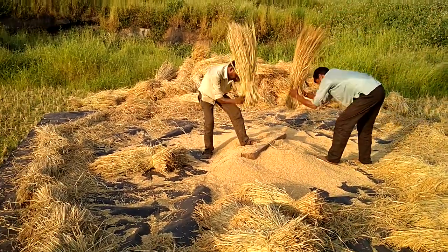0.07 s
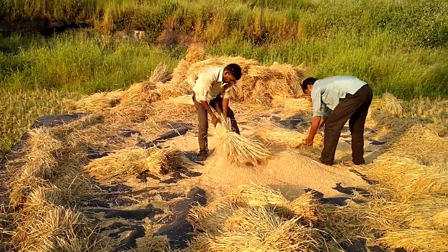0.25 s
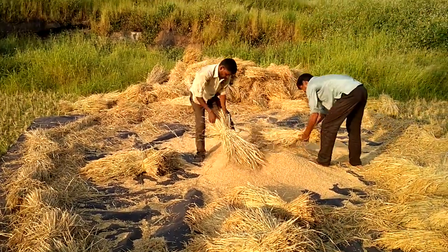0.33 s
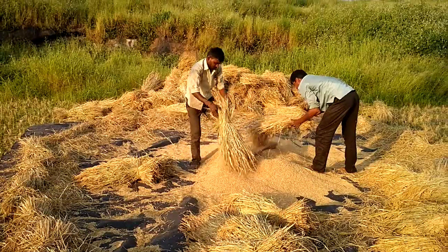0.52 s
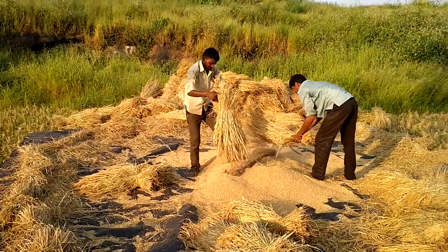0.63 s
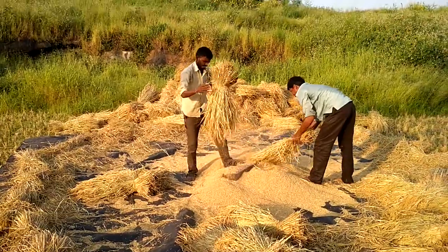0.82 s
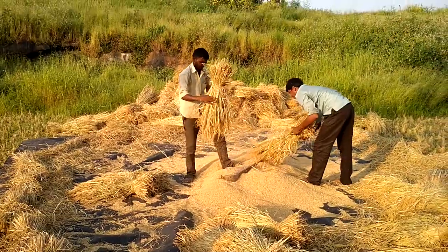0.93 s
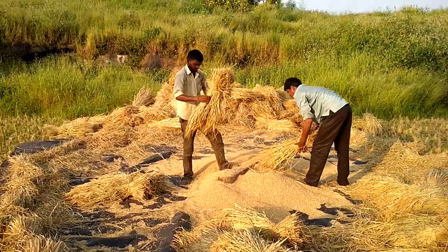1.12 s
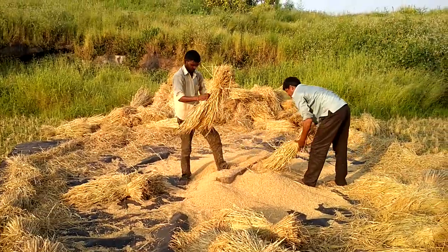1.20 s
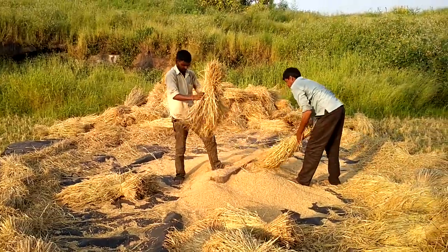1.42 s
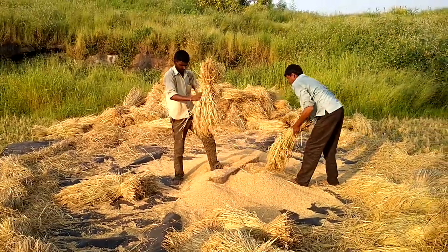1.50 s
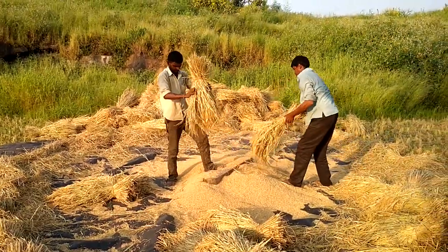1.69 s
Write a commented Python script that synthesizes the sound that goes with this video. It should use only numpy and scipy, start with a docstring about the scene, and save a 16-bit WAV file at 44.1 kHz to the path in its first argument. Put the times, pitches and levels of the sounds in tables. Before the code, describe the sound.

Bundles of dry straw hit heaped grain once, then crackle and hiss while being shaken.

```python
"""An open field, where two workers thresh rice. Their sheaves swish down and slap the grain pile
together, then are dragged up and shaken while loose grain patters down. Rubbing husks hiss, dry
stalks crackle and snap, and feet and sheaves knock softly on the ground. Under it all lie a faint
field hiss and a breath of wind. Each microphone port colours the treble in its own way."""
import sys
import numpy as np
from scipy import signal
from scipy.fft import rfft, irfft, next_fast_len
from scipy.io import wavfile
from scipy.ndimage import map_coordinates

SR = 44100
rng = np.random.default_rng(int(sys.argv[2]) if len(sys.argv) > 2 else 0)


def inscribe(sig):
    """Save sig as 16-bit PCM at rate SR to the path in sys.argv[1].

    A 1-D sig is mono; a 2-D sig holds one channel per row.
    Samples are clipped to [-1, 1] before scaling.
    """
    pcm = np.round(np.clip(np.atleast_2d(sig).T, -1, 1) * 32767)
    wavfile.write(sys.argv[1], SR, pcm.astype(np.int16))


N = 77175

# Sheaf moves. Each row: peak time, rise, hold and t60 in seconds, then hiss level, crackle level,
# hiss left over right, left top-end trim and right top-end trim, all in dB.
SHEAF_STROKES = [(0.25, 0.18, 0.053, 0.081, -25.5, -35, 3.5, -2.5, -1),
                 (0.328, 0.23, 0.088, 0.29, -30.5, -77, 7, -2.5, -3),
                 (0.725, 0.055, 0.03, 0.25, -58, -50, -5, 2, 0),
                 (0.847, 0.076, 0.029, 0.29, -26, -40.5, -2, 1, -11),
                 (0.91, 0.023, 0.0065, 0.12, -37, -42, 14, 3, -10),
                 (1.076, 0.047, 0.067, 0.19, -26.5, -35, 4.5, -4, 3.5),
                 (1.158, 0.18, .11, 0.31, -28.5, -40.5, 4, -2, 1),
                 (1.324, 0.24, .03, 0.9, -55.5, -41.5, 24, 3, -1),
                 (1.452, 0.13, 0.027, 0.26, -32.5, -38.5, 9.5, -0.5, -8),
                 (1.553, 0.35, 0.014, 0.38, -34.5, -41.5, 22, -8.5, 7.5)]
# Modes of the grain pile. Each row: pitch in Hz, level in dB, t60 in seconds.
PILE_MODES = [(66, -28, 0.038), (108, -29, .06), (216, -31.5, 0.11), (327, -47, .06), (497, -33.5, 0.066)]
# Fader ride on the falling grain. Each row: time in seconds, level in dB.
PATTER_FADER = [(.1, -73.5), (.3, -43.5), (.47, -40), (.56, -43), (0.659, -43.5), (0.801, -38.5),
                (.92, -41), (.97, -47.5), (1.04, -44.5), (1.12, -46.5), (1.4, -42), (1.58, -55),
                (1.66, -48.5), (1.75, -56.5)]
# Single stalks breaking. Each row: time in seconds, centre in Hz, level in dB.
STALK_SNAPS = [(0.354, 1920, -59), (0.376, 1970, -43.5), (0.455, 1710, -36), (0.463, 1530, -42.5),
               (0.584, 1840, -43), (0.629, 2240, -39.5), (0.655, 1860, -39), (.73, 2200, -37.5),
               (0.74, 1980, -37), (0.786, 2390, -46), (.913, 1450, -38.5), (.987, 1570, -38),
               (1.073, 4770, -33.5), (1.088, 4350, -28), (1.114, 1320, -40), (1.298, 2240, -38),
               (1.355, 2230, -36.5), (1.372, 1840, -41), (1.407, 2480, -42), (1.433, 2860, -33),
               (1.499, 2100, -39), (1.568, 2840, -41)]
# Bumps of feet and sheaves. Each row: start in seconds, pitch in Hz, level in dB, t60 in seconds.
GROUND_KNOCKS = [(0.397, 99, -43, 0.056), (.545, 380, -60.5, 0.035), (.584, 466, -51.5, 0.021),
                 (.738, 488, -51, 0.057), (0.825, 323, -50.5, 0.03), (0.908, 276, -56, 0.11),
                 (1.0, 55, -66, 0.075), (1.022, 302, -49, 0.026), (1.114, 520, -43.5, 0.028),
                 (1.367, 427, -58, 0.057), (1.7, 377, -54, 0.038)]

# EQ curves of the noise layers and the two ports. Each row: frequency in Hz, relative gain in dB.
HUSK_EQ = [(600, -48), (2000, -28), (4000, -27.5), (7000, -13), (9000, -6), (11500, 0), (13000, -0.5),
           (14500, 1), (16000, -5.5)]
CRACKLE_EQ = [(100, -38), (400, -25), (720, -19), (950, -4.5), (1600, -5.5), (2300, 4), (3400, 2.5),
              (4500, 0), (6000, -2), (9000, 5.5), (11000, -37), (16000, -11)]
SLAP_EQ = [(60, -16), (250, -3), (470, -2.5), (700, -6), (1300, -6.5), (2200, 3), (4000, -5), (6000, -5.5),
           (8500, 5.5), (11000, -26), (16000, -20)]
PUFF_EQ = [(20, 1.5), (60, -0.5), (130, -3.5), (220, -7), (340, -3), (500, -17), (800, -18), (2000, -54)]
GRAIN_EQ = [(100, -27), (400, -12.5), (720, -18.5), (950, 1.5), (1600, -6), (2300, 2.5), (3200, -1),
            (4400, -6), (5600, -1.5), (7500, 2.5), (9200, 2), (9800, -12), (10600, -6), (11700, -3.5),
            (14000, -6), (16000, 0.5)]
FIELD_EQ = [(20, 15), (60, 13), (130, 1.5), (220, 2.5), (500, -2.5), (1000, -6), (3000, -8.5), (6000, -5.5),
            (9000, 9), (12000, 6.5), (16000, 9.5)]
WIND_EQ = [(20, 1), (40, -2.5), (70, -22), (120, -13.5), (200, -30), (600, -39.5)]
LEFT_PORT_EQ = [(1000, -1), (2200, -1.5), (3700, 0.5), (5600, 5.5), (8000, -4), (9300, 1.5), (10300, -61),
                (11000, -12), (12000, -8), (13200, -4), (14500, 0.5), (15600, 1.5)]
RIGHT_PORT_EQ = [(1000, -0.5), (2200, 1.5), (3700, 6), (5600, 2), (8000, -1), (9300, -1), (10300, 3),
                 (11000, 9.5), (12000, 11), (13200, 6.5), (14500, -0.5), (15600, 4)]

# Stereo images of the scene and the slap. Each row: frequency in Hz, left-right likeness from -1 to 1.
SCENE_IMAGE = [(100, 0.41), (1000, 0.89), (2200, 0.64), (3200, -0.02), (4500, -0.02), (6000, -0.25),
               (7500, 0.13), (9000, 0.33), (11500, -0.21), (13500, 0.24), (16000, 0.084)]
SLAP_IMAGE = [(60, 0.5), (200, .5), (400, 0.03), (1000, 0.17), (2500, 0.11), (5000, 0), (14000, 0.2)]


def sheaf_strokes():
    """Swinging sheaves: husks rub into a fine hiss, stalks bend and crackle."""
    husks = ticks(per_second=7000, spread_db=3)
    stalks = ticks(per_second=2000, spread_db=4)
    hiss = sliding_stalks(texture(HUSK_EQ, grit=husks, smooth=0.74), depth_db=1.0)
    top = filtered(hiss, lambda hz: np.clip((hz - 11500) / 1200, 0, 1))
    crackle = sliding_stalks(texture(CRACKLE_EQ, grit=stalks, smooth=0.8), depth_db=2.5)
    envelopes = np.array([swell(*row[:4]) for row in SHEAF_STROKES])
    hiss_db, crackle_db, pan_db, *trim_db = np.transpose(SHEAF_STROKES)[4:]
    fader = lambda db: np.sqrt(amp(db) ** 2 @ envelopes ** 2)  # overlapping strokes add in power
    sides_db = hiss_db + np.array([pan_db, -pan_db]) / 2
    top_db = sides_db + np.array(trim_db)
    return (hiss - top) * fader(sides_db) + top * fader(top_db) + crackle * fader(crackle_db)


def slap():
    """The big hit: hundreds of stalks land at once, grain sprays, the pile thuds and air puffs out."""
    contacts = ticks(per_second=6000, spread_db=3)
    stalks = hollow(texture(SLAP_EQ, SLAP_IMAGE))
    stalks *= amp(-21.5) * swell(0.302, rise=0.044, hold=0.0049, t60=0.082)
    spray = hollow(texture(HUSK_EQ, SLAP_IMAGE, grit=contacts, smooth=0.48))
    spray *= amp(-18.5) * swell(0.2975, rise=0.008, hold=0.021, t60=0.11)
    puff = amp(-49.5) * swell(0.2624, rise=0.087, hold=0.072, t60=0.39) * texture(PUFF_EQ)
    return stalks + spray + pile_thud() + puff


def pile_thud(start_s=0.3, attack_s=0.0028):
    """The weight under the slap: the pile gives way with a few heavily damped low modes."""
    t = np.maximum(clock() - start_s, 0)
    modes = sum(amp(db - 60 * t / t60) * np.sin(2 * np.pi * hz * t) for hz, db, t60 in PILE_MODES)
    return (1 - np.exp(-t / attack_s)) * modes


def falling_grain():
    """Freed grains patter on the pile and the straw."""
    grains = ticks(per_second=1500, spread_db=5)
    patter = sliding_stalks(texture(GRAIN_EQ, grit=grains, smooth=0.64), depth_db=2.5)
    level_db = np.interp(clock(), *np.transpose(PATTER_FADER))
    return amp(level_db) * patter


def stalk_snaps(rolloff_db_per_octave=7.5):
    """Now and then one stalk cracks through the rustle, in its own register and with no bass."""
    out = np.zeros((2, N))
    for at_s, hz, db in STALK_SNAPS:
        eq = [(hz / 4, -35), (hz / 2, -8), (hz, 0), (8 * hz, -3 * rolloff_db_per_octave)]
        out += amp(db) * swell(at_s, rise=0.0016, hold=0, t60=0.027) * texture(eq)
    return out


def ground_knocks(attack_s=0.0019):
    """Dull, quickly damped bumps on the covered ground, each half thump and half scuff."""
    out = np.zeros((2, N))
    for start_s, hz, db, t60 in GROUND_KNOCKS:
        t = np.maximum(clock() - start_s, 0)
        thump = np.sqrt(2) * np.sin(2 * np.pi * hz * t)
        scuff = texture([(hz / 4, -14), (hz, 0), (2 * hz, -7), (10 * hz, -28)])
        envelope = amp(db - 60 * t / t60) * (1 - np.exp(-t / attack_s))
        out += envelope * (thump + scuff)
    return out


def field_air():
    """The bed: faint open-field hiss and one low breath of wind on the ports."""
    bed = amp(-60.5) * texture(FIELD_EQ)
    breeze = amp(-56.5) * swell(0.13, rise=0.9, hold=0.24, t60=0.46) * texture(WIND_EQ)
    return bed + breeze


def sliding_stalks(x, depth_db, width_hz=262.7, life_s=0.0599):
    """Stalks slide past each other, so narrow resonances come and go."""
    size, hop = 1024, 512
    spectrum = signal.stft(x, nperseg=size)[2]
    band, frame = np.indices(spectrum.shape[1:])
    position = [band * SR / size / width_hz, frame * hop / SR / life_s]
    patches = map_coordinates(rng.standard_normal((256, 128)), position, mode="wrap")
    coloured = signal.istft(spectrum * amp(depth_db * patches), nperseg=size)[1]
    return unit(coloured[:, :N])


def hollow(pair, bleed=0.6, delay_s=0.0026):
    """Each side reaches the other a moment late, which sounds wide and hollow."""
    crossed = filtered(pair[::-1], lambda hz: np.exp(-2j * np.pi * hz * delay_s))
    return unit(pair + bleed * crossed)


def ticks(per_second, spread_db):
    """Envelope of tiny random contacts of uneven size, each about a third of a millisecond long."""
    hits = rng.random(N) < per_second / SR
    size = amp(spread_db * np.minimum(rng.standard_normal(N), 2))
    power = signal.lfilter([1], [1, -np.exp(-3000 / SR)], hits * size ** 2)
    return np.sqrt(power)


def texture(eq, image=SCENE_IMAGE, grit=1, smooth=0):
    """Coloured stereo noise of rms 1, roughened by the grit envelope but for a smooth share."""
    power = smooth + (1 - smooth) * unit(np.asarray(grit)) ** 2
    noise = rng.standard_normal((2, N)) * np.sqrt(power)
    width = lambda hz: np.arccos(np.clip(curve(image, hz), -1, 1)) / 2
    mid, side = filtered(noise, lambda hz: amp(curve(eq, hz)) * [np.cos(width(hz)), np.sin(width(hz))])
    return unit(np.array([mid + side, mid - side]))


def swell(peak_s, rise, hold, t60, sag_db_per_s=1.5):
    """Envelope timed in seconds: climb 60 dB to the peak, hold with a slight sag, die away."""
    t = clock() - peak_s
    attack_db = 60 * np.maximum(-t, 0) / rise
    sag_db = sag_db_per_s * np.clip(t, 0, hold)
    release_db = 60 * np.maximum(t - hold, 0) / t60
    return amp(-attack_db - sag_db - release_db)


def filtered(x, response):
    """Run x through a frequency response."""
    size = next_fast_len(N + 8192)
    hz = np.fft.rfftfreq(size, 1 / SR)
    return irfft(rfft(x, size) * response(hz), size)[..., :N]


def curve(points, hz):
    """Read (Hz, value) points along a log frequency axis."""
    points_hz, values = np.transpose(points)
    return np.interp(np.log(hz + 1), np.log(points_hz + 1), values)


def amp(db):
    """Decibels to gain."""
    return 10 ** (np.asarray(db) / 20)


def unit(x):
    """Scale to rms 1."""
    return x / np.sqrt(np.mean(x ** 2) + 1e-20)


def clock():
    """Each sample's time in seconds."""
    return np.arange(N) / SR


def scene():
    """The open-air mix, with no reverb."""
    return sheaf_strokes() + slap() + falling_grain() + stalk_snaps() + ground_knocks() + field_air()


def record(dry, cutoff_hz=15900):
    """Each microphone port colours the treble, and a brick-wall low-pass takes off the very top."""
    ports = lambda hz: amp([curve(LEFT_PORT_EQ, hz), curve(RIGHT_PORT_EQ, hz)])
    return filtered(dry, lambda hz: ports(hz) * (hz < cutoff_hz))


dry = scene()
out = record(dry)
inscribe(out)
```